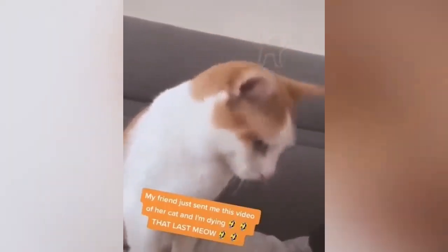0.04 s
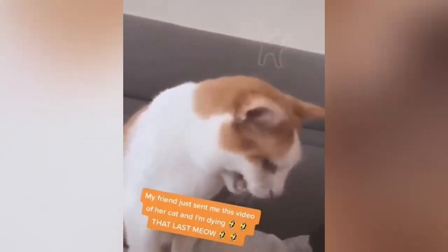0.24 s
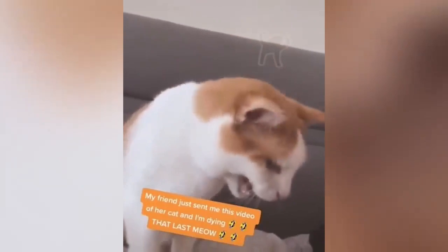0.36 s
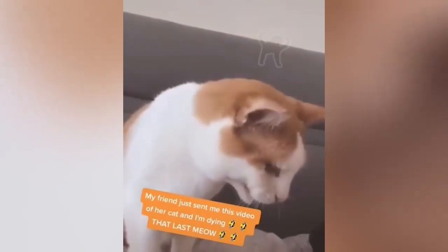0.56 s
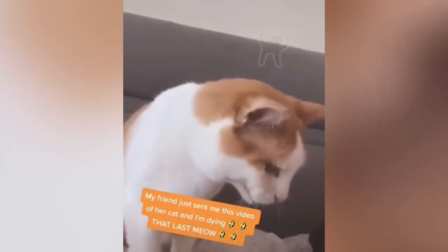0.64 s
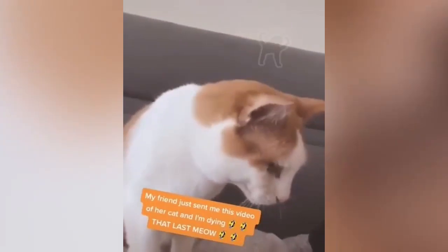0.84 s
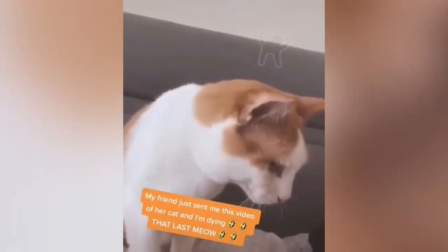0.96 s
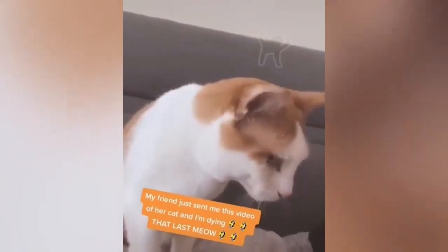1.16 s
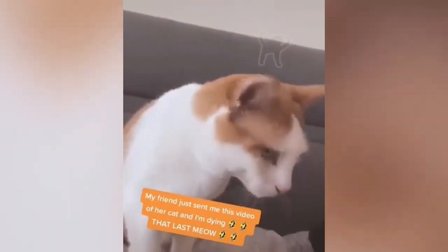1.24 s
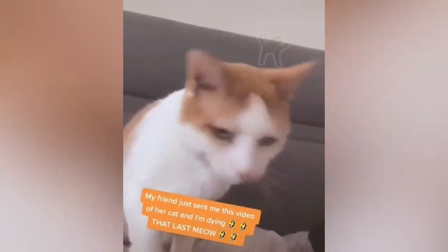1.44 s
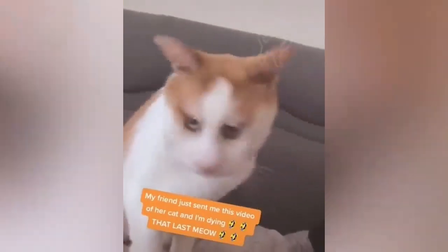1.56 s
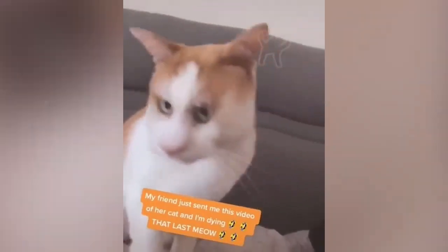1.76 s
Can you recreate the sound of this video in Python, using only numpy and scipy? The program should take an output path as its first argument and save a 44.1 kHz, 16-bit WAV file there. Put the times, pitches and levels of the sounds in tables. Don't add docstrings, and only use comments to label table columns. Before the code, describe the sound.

One close cat meow starts abruptly, rises slightly in pitch and darkens as the mouth shuts with wet smacks; then light ticks and fabric rustle in a soft, dry indoor room with low machine hum.

```python
import sys
import numpy as np
from scipy import signal
from scipy.fft import rfft, irfft, next_fast_len
from scipy.io import wavfile
from scipy.ndimage import uniform_filter1d, map_coordinates

SR = 44100
rng = np.random.default_rng(int(sys.argv[2]) if len(sys.argv) > 2 else 0)


def magnitude_from_level(level_db):
    exponent = np.asarray(level_db, float) / 20
    return 10 ** exponent


def bounce(signal):
    frames = np.transpose(np.atleast_2d(signal))
    limited = np.clip(frames, -1, 1)
    pcm = np.round(limited * 32767).astype(np.int16)
    wavfile.write(sys.argv[1], SR, pcm)


N = 79380


def unit(x):
    return x / np.sqrt(np.mean(x ** 2) + 1e-20)


def curves(rows):
    s, *cols = np.transpose(rows)
    return [uniform_filter1d(np.interp(np.arange(N) / SR, s, c), size=400) for c in cols]


def wobble(rate):
    return map_coordinates(rng.standard_normal(int(N * rate / SR) + 4), [np.arange(N) * rate / SR])


def filtered(x, response):
    m = next_fast_len(N + 8192)
    return irfft(rfft(x, m) * response(np.fft.rfftfreq(m, 1 / SR)), m)[:N]


def coloured(x, points):
    f, db = np.transpose(points)
    return unit(filtered(x, lambda hz: magnitude_from_level(np.interp(np.log(hz + 1), np.log(f + 1), db))))


# f/Hz, density/dB per Hz
HISS_COLOUR = [(25, -9), (45, 8.5), (130, 1.5), (320, -6), (1000, -13.5), (2200, -15.5), (4500, -23),
               (12000, -34.5)]
# f/Hz, drift width/Hz, level/dB
HUMS = [
    (49.5, 0.67, -43.5),
    (59.65, 1.86, -48.5),
    (102.4, 2.76, -55.5),
    (154.3, 4, -61.5),
    (189, 3.85, -70.5),
    (246.4, 1.38, -65.5),
]


def room_floor():
    t = np.arange(N) / SR
    hums = np.zeros(N)
    for hz, width_hz, db in HUMS:
        level = magnitude_from_level(db + 1.6 * wobble(5.83)) * np.sqrt(2)
        drift = np.cumsum(width_hz * wobble(6.7)) / SR
        hums += level * np.sin(2 * np.pi * (hz * t + drift + rng.random()))
    hiss_db = -50.5 + 1.9 * wobble(2.86)
    return hums + magnitude_from_level(hiss_db) * coloured(rng.standard_normal(N), HISS_COLOUR)


# t/s, level/dB
RUSTLE = [(0, -49.5), (.07, -53), (.10, -54.5), (.14, -49.5), (.2, -51.5), (.4, -52), (.46, -48),
          (.51, -58.5), (.7, -68), (.95, -58), (1.05, -56.5), (1.12, -59.5), (1.27, -54.5), (1.4, -68),
          (1.55, -58), (1.72, -62.5), (1.77, -49), (1.8, -45.5)]
# f/Hz, density/dB per Hz
CLOTH_COLOUR = [(300, -45), (600, -9), (1200, -5), (3000, -4.5), (6000, -10.5), (12000, -21),
                (13000, -17.5)]


def cloth():
    grains_per_s, spread_db, grain_share = 900, 3, .5
    level_db, = curves(RUSTLE)
    draw = rng.random((N, 2))
    catches = draw[:, 0] < grains_per_s / SR
    sizes = magnitude_from_level(-spread_db * np.log(draw[:, 1] + .02))
    grains = catches * sizes * rng.standard_normal(N)
    rub = grain_share * unit(grains) + rng.standard_normal(N)
    return magnitude_from_level(level_db + 2.8 * wobble(30.02)) * coloured(rub, CLOTH_COLOUR)


def room_tail(x):
    t60_s = .15
    t = np.arange(SR // 4) / SR
    tail = rng.standard_normal(len(t)) * magnitude_from_level(-60 * t / t60_s)
    return signal.fftconvolve(x, tail / np.linalg.norm(tail))[:N]


# t/s, peak level/dB, f/Hz
TICKS = [(.0164, -35, 3280), (.0494, -38, 1810), (.111, -34.5, 2400), (.129, -33, 2210), (.1402, -30, 3500),
         (.7497, -26, 1560), (.7757, -36.5, 2480), (.8644, -38, 1790), (.9482, -29, 4130),
         (.9507, -26, 2860), (.9614, -38, 1840), (1.0189, -31.5, 2960), (1.0195, -36, 1110),
         (1.058, -37, 2200), (1.1515, -33, 5950), (1.1588, -26, 3200), (1.2256, -38, 3530),
         (1.256, -39, 1900), (1.3405, -36.5, 2860), (1.549, -30.5, 1980), (1.6398, -32, 4000),
         (1.7217, -34.5, 1430), (1.7575, -42, 2200), (1.78, -36, 1560)]
# t/s, peak level/dB, f/Hz
SMACKS = [
    (.298, -33, 2600),
    (.401, -35, 3200),
    (.4545, -32, 2800),
    (.4625, -33, 8000),
    (.706, -42, 5000),
]


def ticks():
    ring_cycles, snap_t60_s, snap_share = 4, .004, .25
    out, t = np.zeros(N + SR), np.arange(SR // 20) / SR
    for s, db, hz in [*TICKS, *SMACKS]:
        decay = magnitude_from_level(-60 * t * hz / ring_cycles / 2)
        ring = np.sin(2 * np.pi * hz * t) * decay * (1 - np.exp(-t * hz * 3))
        dull_noise = uniform_filter1d(rng.standard_normal(len(t)), size=3)
        snap = snap_share * dull_noise * magnitude_from_level(-60 * t / snap_t60_s)
        out[round(s * SR):][:len(t)] += magnitude_from_level(db + 1.5) * (ring + snap)
    pop_s, pop_db, pop_t60_s = .7525, -32, .05
    pop_hz = 130 + 300 * np.exp(-t / .005)
    pop = magnitude_from_level(pop_db - 60 * t / pop_t60_s) * np.sin(2 * np.pi * np.cumsum(pop_hz) / SR)
    out[round(pop_s * SR):][:len(t)] += pop
    return out[:N]


# t/s, f/Hz
PITCH = [
    (.206, 492),
    (.222, 464.5),
    (.266, 489),
    (.295, 484),
    (.332, 476),
    (.572, 541.9),
    (.635, 534.9),
    (.70, 507),
    (.748, 484),
]
# t/s, level/dB, jaw resonance f/Hz, mouth resonance f/Hz, closing (0 open, about 1
MOUTH = [
    (.21, -31.5, 650, 2080, 0.15),
    (.275, -29, 702, 2350, 0.05),
    (.34, -31.5, 680, 2245, 0.18),
    (.425, -33.5, 680, 2100, 0.33),
    (.442, -34.5, 715.5, 1910, 0.41),
    (.52, -39, 813, 1600, 0.34),
    (.61, -38, 879, 1631, 0.68),
    (.69, -36, 580, 1580, 0.86),
    (.745, -33.5, 474, 1450, 1.1),
]
# f/Hz, share of mouth shift, width/Hz, level/dB, level change when closed/dB
THROAT = [
    (2400, 0.97, 830, 3, -7),
    (3424, 1.07, 520, -2.5, -10.5),
    (4620, .2, 1700, -15, -38),
]
# t/s, half length/s, level change/dB
TONGUE_DROPS = [
    (.443, .009, -8),
    (.517, .012, -5),
]


def resonance(f, hz, width_hz):
    detuning = hz * hz - f * f
    return 1j * (f * width_hz) ** 2 / (detuning + 1j * f * width_hz) / np.hypot(detuning, f * width_hz)


def vocal_tract(f, jaw_hz, mouth_hz, closing):
    t = np.arange(N) / SR
    tongue_db = sum(db * np.exp(-((t - s) / half_s) ** 2) for s, half_s, db in TONGUE_DROPS)
    tract = resonance(f, jaw_hz, 630)
    for hz, share, width_hz, db, closed_db in THROAT:
        level_db = db + closed_db * closing + tongue_db * (hz < 3000)
        moved_hz = hz + share * (mouth_hz - 2400)
        tract = tract + magnitude_from_level(level_db) * resonance(f, moved_hz, width_hz)
    lip_hz = np.maximum(4760 - 3720 * closing, 500)
    lips = 1 / np.sqrt(1 + (f / lip_hz) ** 8)
    nose = magnitude_from_level(-18.5 - 23 * closing) * resonance(f, 6210, 1700)
    return np.abs(lips * tract + nose)


def meow():
    start_s, end_s, attack_s, release_s = .2055, .7535, .008, .008
    jitter, shimmer_db, flutter_db, top_blur = .0025, .6, 2.1, .12
    t = np.arange(N) / SR
    pitch_hz, = curves(PITCH)
    effort_db, jaw_hz, mouth_hz, closing = curves(MOUTH)
    shaky_hz = pitch_hz * (1 + jitter * (wobble(63.76) + wobble(300)))
    phase = 2 * np.pi * np.cumsum(shaky_hz) / SR
    k = np.arange(1, 16)[:, None]
    f = k * pitch_hz
    tract = vocal_tract(f, jaw_hz, mouth_hz, closing)
    voice_top = 1 / (1 + (f / 6790) ** 40)

    blur = top_blur * k
    flutter = magnitude_from_level(flutter_db * (0.35 + blur) * np.array([wobble(25.47) for _ in k]))
    tongue_rough_db = 16 * np.exp(-((t - .45) / .023) ** 2)
    onset_rough_db = 13 * np.exp(-np.abs(t - start_s) / .016)
    breath_db = -25 + tongue_rough_db + onset_rough_db
    breath = np.array([wobble(500) + 1j * wobble(500) for _ in k])
    puffs = magnitude_from_level(breath_db) * (0.23 + blur) * breath

    pulse_lean = .6 + 1.4 * closing
    pulses = np.exp(1j * (k * phase - pulse_lean))
    tone = np.real(np.sum(tract * voice_top * (flutter + puffs) * pulses, axis=0))
    gate = np.clip((t - start_s) / attack_s, 0, 1) * np.clip((end_s - t) / release_s, 0, 1)
    return np.sqrt(2) * magnitude_from_level(effort_db + shimmer_db * wobble(200)) * gate * tone


def scene():
    near = meow() + ticks()
    return (room_floor() + cloth() + magnitude_from_level(-24) * room_tail(near) + near)[None]


def top_cut(x):
    return signal.sosfilt(signal.butter(12, 12950, fs=SR, output="sos"), x)


def record(dry):
    top_hz, edge_hz = 11780, 250
    mix = filtered(dry[0], lambda hz: 1 / (1 + np.exp(np.clip((hz - top_hz) / edge_hz, -40, 40))))
    return top_cut(mix[None])


dry = scene()
out = record(dry)
bounce(out)
```